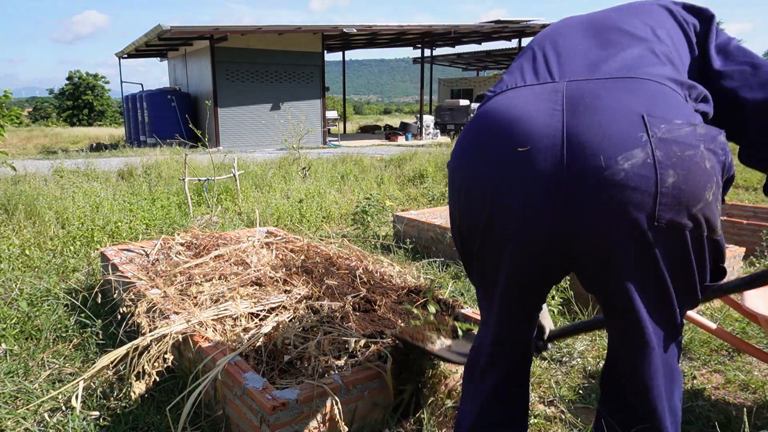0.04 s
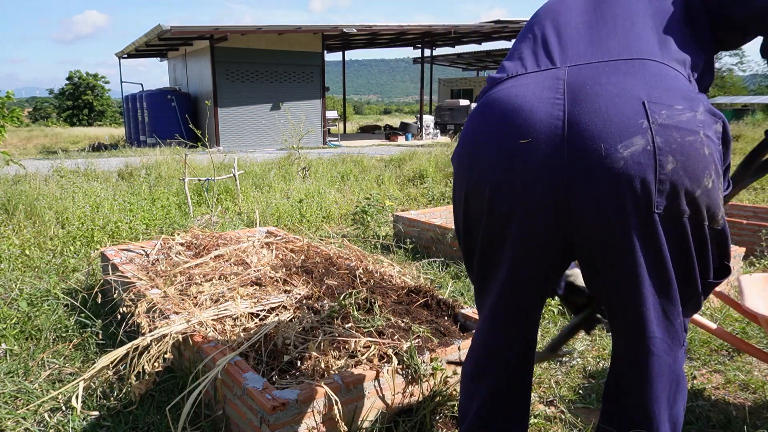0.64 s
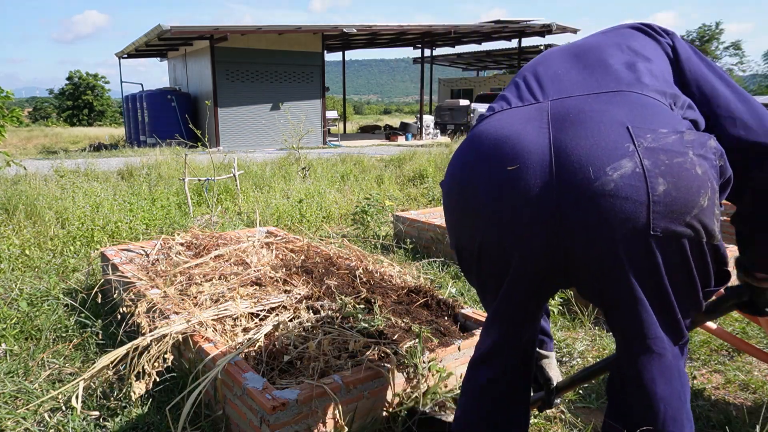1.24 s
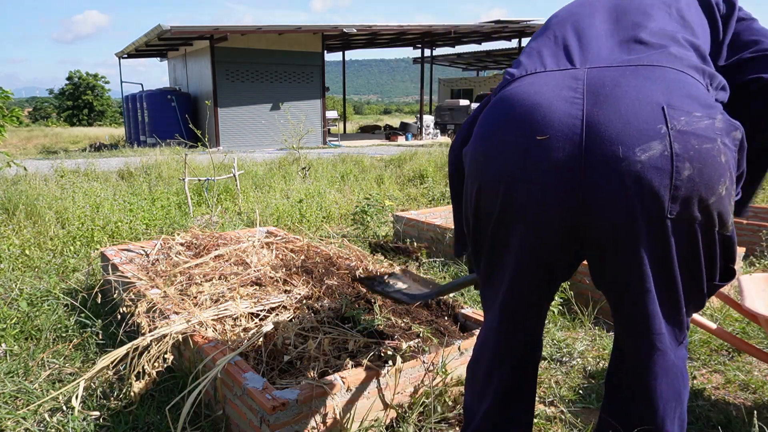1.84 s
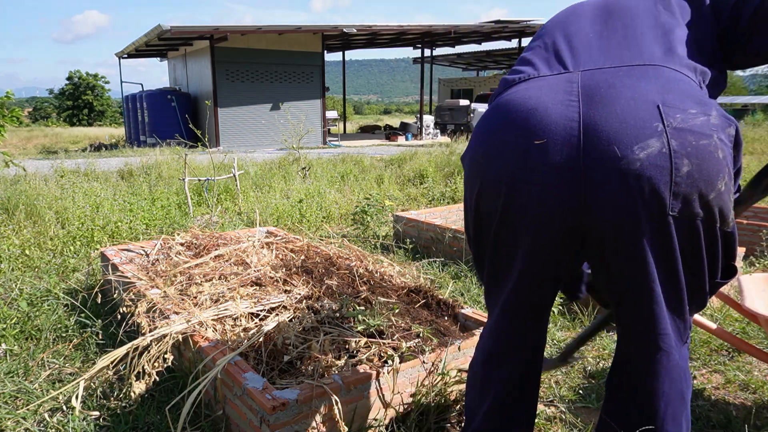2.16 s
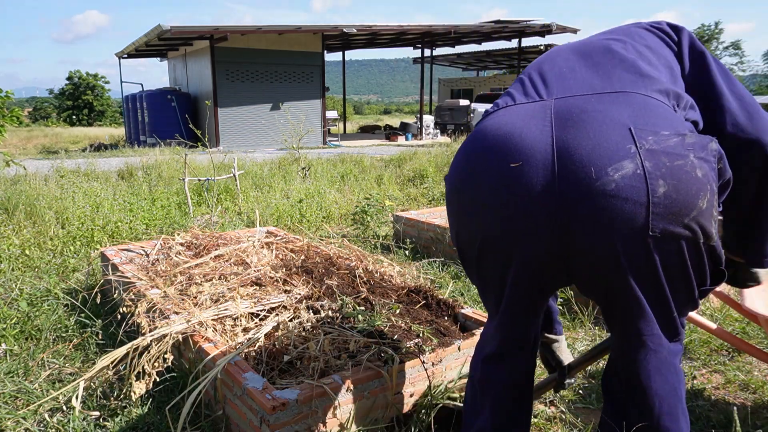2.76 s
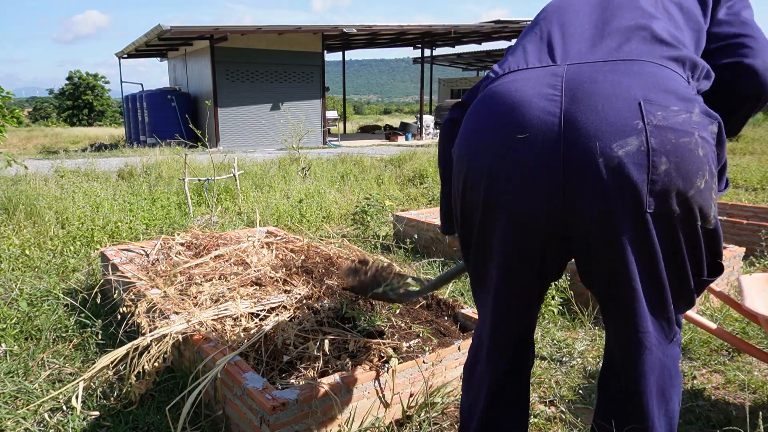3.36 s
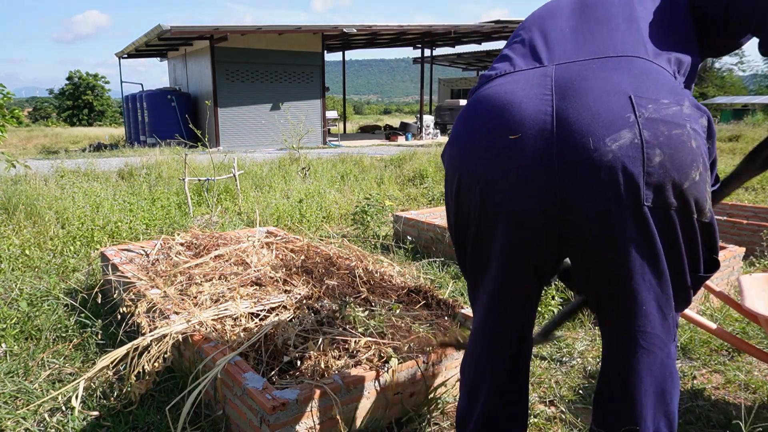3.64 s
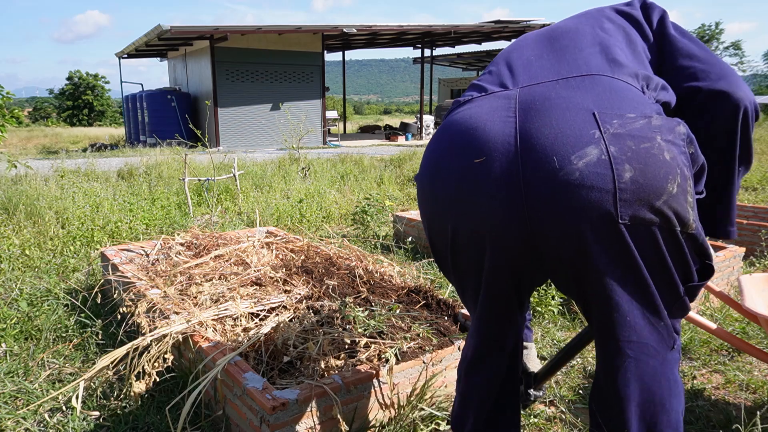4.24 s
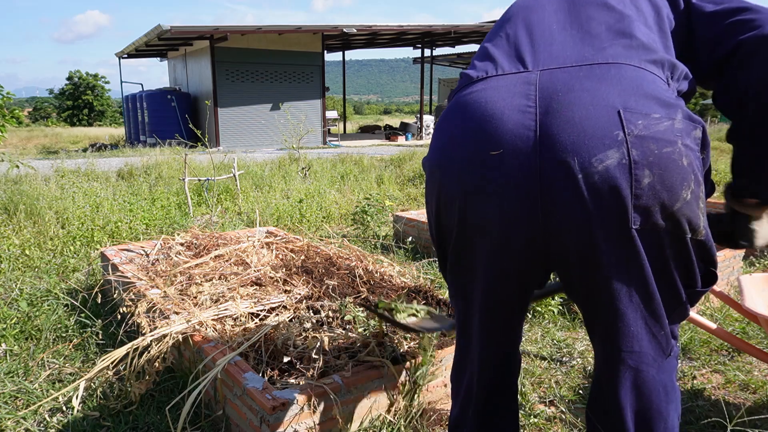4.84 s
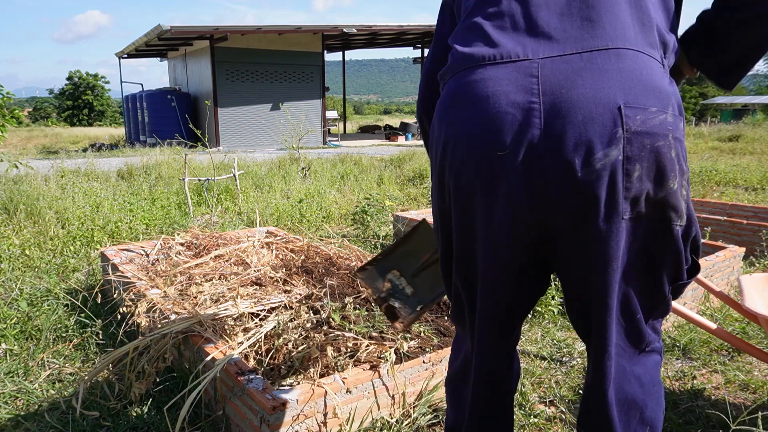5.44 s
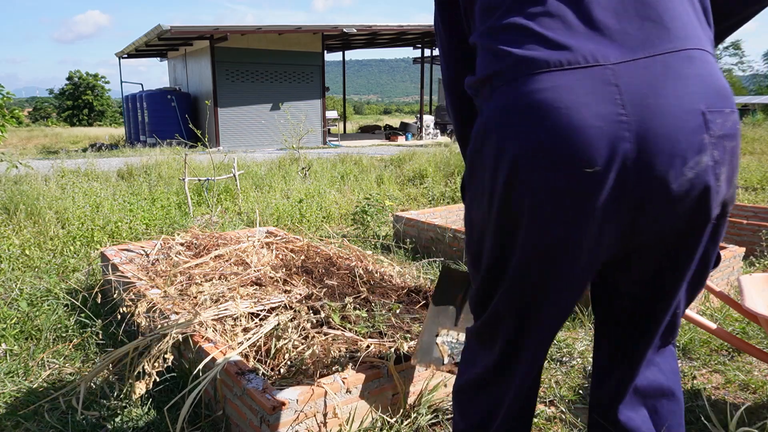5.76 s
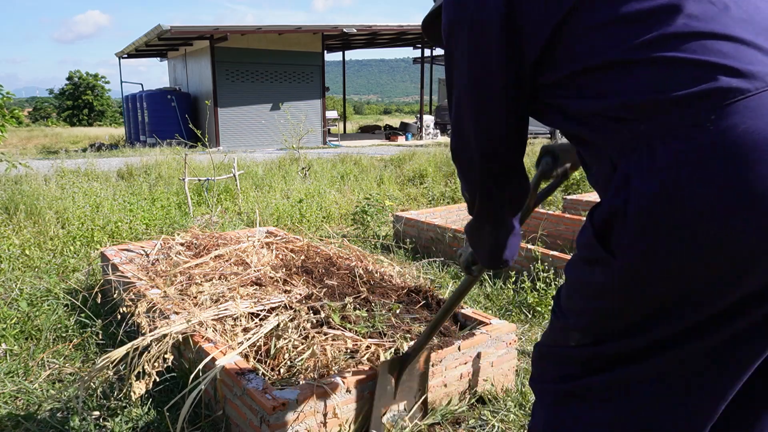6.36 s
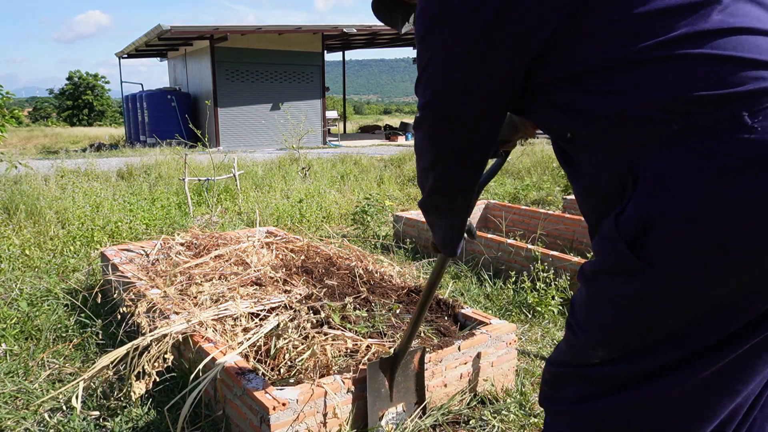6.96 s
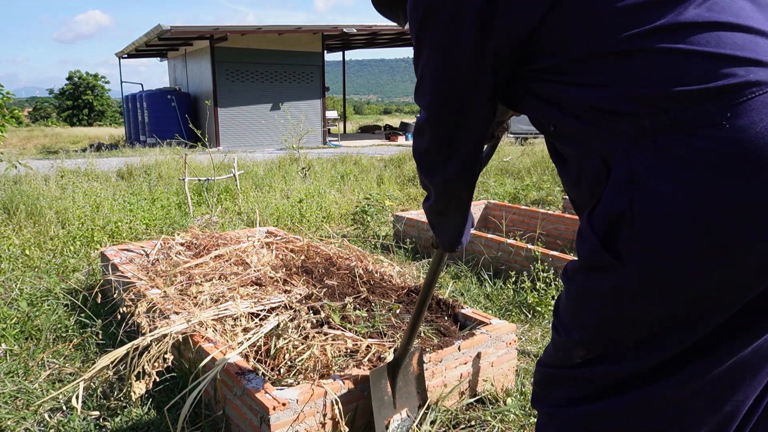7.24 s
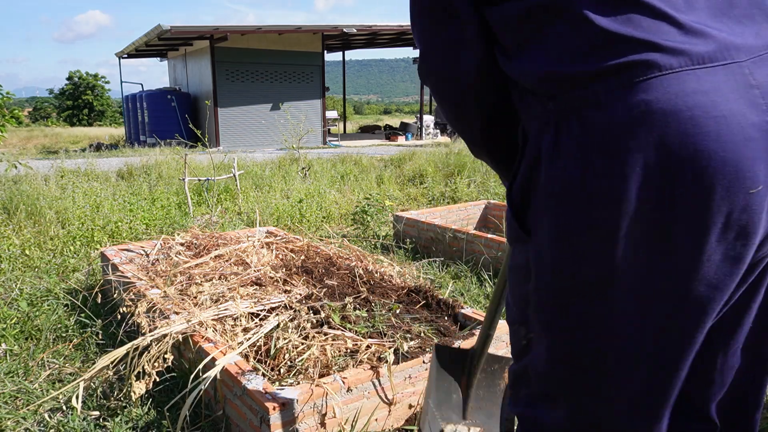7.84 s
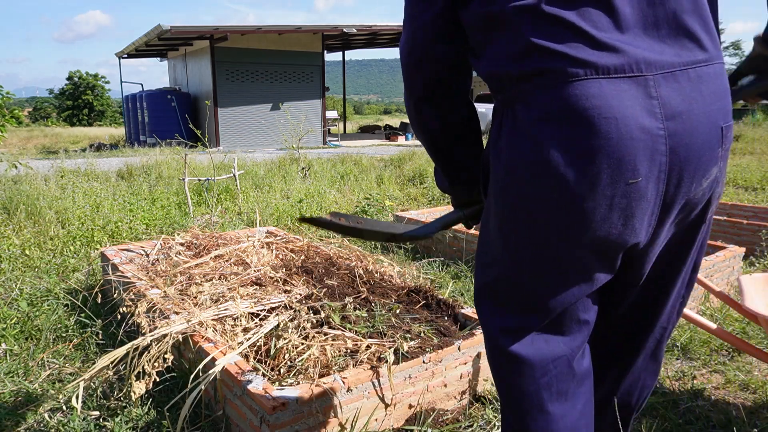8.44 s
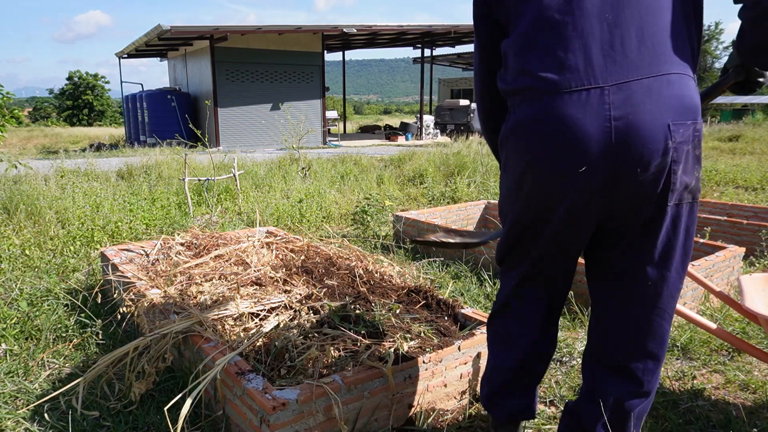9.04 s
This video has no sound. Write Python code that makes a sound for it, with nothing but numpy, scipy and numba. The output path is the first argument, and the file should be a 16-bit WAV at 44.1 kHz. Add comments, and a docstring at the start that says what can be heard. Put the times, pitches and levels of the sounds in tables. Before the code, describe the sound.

A steel spade works close by in compost and dry straw, outdoors with almost no echo. Cicadas hold a high warbling whine throughout over a faint hiss of air. After light rustling, the blade chops in at 1 second with a gritty crunch and soft thud, then scrapes until about 1.7. A second stroke lands at 2.5 seconds, grinding into a sharp metallic hit at 3, and the load slides softly off at 3.4. More crunching chops come at 4 and 4.4, followed by scraping, snapping stalks and rustling until about 6. A loud, briefly ringing knock falls at 6.4 seconds, with dull clods around it. The blade scrapes and catches again from 7 to 7.8, then only faint rustles and ticks of straw remain until just past 9. A distant bird gives a few quick raspy chirps near 2 and 9 seconds.

```python
"""Digging compost in a field

A steel spade works in a straw-covered brick bed. Each contact crushes grit, thumps the soil and excites
the blade's modes, which are damped while buried and ring on when lifted. Friction grinds, stalks crackle
by brittle fracture, and the load slides onto the straw. Cicadas keep up a high warbling whine with their
tymbals; a far bird calls now and then over the hiss of air and grass."""
import sys
import numpy as np
from scipy import signal
from scipy.fft import rfft, irfft
from scipy.io import wavfile
from numba import njit

SR = 44100
rng = np.random.default_rng(int(sys.argv[2]) if len(sys.argv) > 2 else 0)


def store_pcm(level_fs):
    """Save levels as 16-bit WAV."""
    pcm = np.round(np.clip(level_fs, -1, 1) * 32767).astype(np.int16)
    wavfile.write(sys.argv[1], SR, np.atleast_2d(pcm).T)


N = 405719

# spectrum of shifting soil: f/Hz, level/dB
SOIL_SPECTRUM = [(50, -44.5), (100, -32.5), (150, -29.5), (290, -22), (390, -4.5), (490, 1), (700, 10),
                 (1100, 3), (1600, -14.5), (3000, -37.5)]
# spectrum of cracking straw: f/Hz, level/dB
STRAW_SPECTRUM = [(150, -60), (400, -24.5), (1200, -10.5), (2200, 0), (3000, 3), (4600, 3.5), (6300, -2.5),
                  (8000, -6.5), (11000, -23), (15500, -29.5)]


def from_db(db):
    """Amplitude ratio of a level in decibels."""
    return 10 ** (np.asarray(db) / 20)


def rms_one(x):
    """Normalisation to unit power."""
    return x / np.sqrt(np.mean(x ** 2) + 1e-20)


def in_time(rows):
    """Linear interpolation of each column of a timed table to every sample."""
    times, *columns = np.transpose(rows)
    return [np.interp(np.arange(N) / SR, times, column) for column in columns]


def add(track, onset, sound):
    """Superposition of a sound on a track, at an onset in seconds."""
    start = max(round(onset * SR), 0)
    track[start:start + len(sound)] += sound[:N - start]


def gestures(rows, attack_s, release_t60):
    """Summed envelopes of linear rise, hold and exponential decay; rows are t/s, length/s, height."""
    out = np.zeros(N)
    for onset, length, height in rows:
        t = np.arange(round((length + 1.5 * release_t60) * SR)) / SR
        decay = from_db(-60 * np.maximum(t - length, 0) / release_t60)
        add(out, onset, height * np.minimum(t / attack_s, 1) * decay)
    return out


def drift(rate_hz):
    """Slow random modulation: low-passed noise of unit rms."""
    step, settle = 20, 4000
    pole = np.exp(-2 * np.pi * step * rate_hz / SR)
    noise = rng.standard_normal(N // step + settle + 2)
    slow = signal.lfilter([1], [1, -2 * pole, pole * pole], noise)[settle:]
    return np.interp(np.arange(N) / step, np.arange(len(slow)), rms_one(slow))


def low_pass(x, hz, order=2):
    """Maximally flat attenuation above a cutoff."""
    return signal.sosfilt(signal.butter(order, min(hz, .45 * SR), fs=SR, output="sos"), x)


def coloured(x, spectrum):
    """Minimum-phase filtering to a spectrum; white noise keeps its power."""
    size = 4096
    hz, db = np.transpose(spectrum)
    bins_hz = np.fft.rfftfreq(size, 1 / SR) + 1
    log_gain = np.log(from_db(np.interp(np.log(bins_hz), np.log(hz), db)))
    causal_cepstrum = 2 * irfft(log_gain)[:size // 2]
    response = irfft(np.exp(rfft(causal_cepstrum, size) - log_gain.mean()))
    return signal.oaconvolve(x, response / np.linalg.norm(response))[:N]


def grains(per_s, spread_db, hiss):
    """Shot noise: random tiny fractures, a few of them large, over a bed of finer ones."""
    sizes = from_db(spread_db * np.minimum(rng.exponential(1, N), 5)) * rng.choice([-1, 1], N)
    fractures = rms_one(sizes * (rng.random(N) < per_s / SR))
    return rms_one(fractures + hiss * rng.standard_normal(N))


def panned(x, left_db):
    """Localisation by level difference, left minus right."""
    return x * from_db([[left_db / 2], [-left_db / 2]])


def diffuse(t60):
    """Impulse response of dense, exponentially decaying reflections, with unit energy."""
    t = np.arange(SR // 8) / SR
    cluster = rng.standard_normal(len(t)) * from_db(-60 * t / t60)
    return cluster / np.linalg.norm(cluster)


def scattered(x, t60, top_hz):
    """Diffuse reflection from the shed, the trees and the ground, in stereo."""
    t = np.arange(SR) / SR
    tail = rng.standard_normal(SR) + .3 * rng.standard_normal((2, SR))
    tail = low_pass(tail, top_hz) * from_db(-60 * t / t60) * np.minimum(t / .02, 1)
    return signal.oaconvolve(x[None], tail / np.linalg.norm(tail[0]), axes=1)[:, :N]


def field_air():
    """Far air and grass give broadband noise, partly coherent between left and right."""
    # ambient spectrum: f/Hz, level/dB
    spectrum = [(25, -20), (100, -18.5), (300, -9.5), (900, -6), (2500, 0.5), (5000, 2.5), (8000, -11.5),
                (15000, -30)]
    mid, side = [coloured(rng.standard_normal(N), spectrum) for _ in range(2)]
    return from_db(-68) * mid + from_db(-74.5) * side * np.array([[1], [-1]])


def cicada(hz, db, warble_hz, depth_hz, shift_hz):
    """Tymbal clicks fuse into a warbling tone; resonance of the abdomen lifts the fifth harmonic."""
    # partials of the click train: harmonic number, level/dB
    harmonics = [(4, -24), (5, 0), (6, -25), (7, -27), (8, -38)]
    warble_cycles = np.cumsum(warble_hz * (1 + .08 * drift(2))) / SR + rng.random()
    pitch = hz + shift_hz + depth_hz * np.sin(2 * np.pi * warble_cycles) + 14 * drift(180)
    click_rate = pitch / 5
    phase = 2 * np.pi * np.cumsum(click_rate) / SR
    song = sum(from_db(level_db) * np.sin(k * phase) for k, level_db in harmonics)
    return from_db(db + 2.4 * drift(30)) * rms_one(song)


def insects():
    """A cicada chorus, a nearer singer and a far trill add incoherently and are scattered by leaves."""
    # chorus: f/Hz, relative level/dB, warble rate/Hz, warble depth/Hz, left minus right/dB
    singers = [(6750, -76.5, 29, 100, 7), (7300, -65.5, 10.9, 105, 0.5), (6976, -59.5, 17, 110, 9),
               (7110, -60, 10.3, 97, 11.5), (6990, -69, 15, 95, 1), (7260, -68, 5.5, 76, 4)]
    # the nearer cicada: same columns
    near_singer = (7310.5, -3, 13, 98, -5.5)
    # course of the song: t/s, pitch shift/Hz, chorus gain/dB, near gain/dB
    singing = [(0, -4.5, 1, -52), (1, -17, 2.5, -57), (2.2, -45, 3, -64.5), (3.4, -6.5, 0.5, -53),
               (5, 0, 3.5, -58.5), (6, 16.5, 0, -57.5), (7, 22, -0.5, -53), (7.9, 11, -1.5, -50.5),
               (8.25, 11, 0.5, -47), (8.6, 0, 1.5, -67), (9, 29, 1, -48), (9.2, 15, 5.5, -58)]
    # spectrum of the far trill: f/Hz, level/dB
    trill_spectrum = [(4300, -44), (4650, -5.5), (4830, 9.5), (4980, -10.5), (5300, -45.5)]
    shift_hz, chorus_db, near_db = in_time(singing)
    chorus = sum(panned(cicada(*voice, shift_hz), left_db) for *voice, left_db in singers)
    near = panned(cicada(*near_singer[:-1], shift_hz), left_db=near_singer[-1])
    trill = from_db(-74 + 2 * drift(12)) * coloured(rng.standard_normal(N), trill_spectrum)
    songs = chorus * from_db(chorus_db) + near * from_db(near_db) + panned(trill, left_db=13)
    foliage = signal.oaconvolve(songs.mean(axis=0), diffuse(t60=.03))[:N]
    return songs + foliage * np.array([[1], [-1]])


def effort():
    """Scrapes and rustles add in power; returns the envelopes on soil, steel, stalks and fine fibres."""
    # the blade pushed through compost: t/s, length/s, level/dB, relative drag/dB, relative soil/dB
    scrapes = [(1.045, 0.15, -55, -1, -33), (1.205, .2, -45, 0, -34), (1.447, 0.2, -48, 4, -19),
               (2.72, 0.21, -51.5, 5.5, -13), (4.325, 0.17, -45.5, -6.5, -26),
               (4.611, 0.15, -45.5, -4, -16.5), (7.029, 0.19, -48.5, 3, -16), (7.241, .14, -44.5, -4, -45),
               (7.43, 0.2, -43.5, -15.5, -53), (7.525, 0.22, -49, -0.5, -32)]
    # straw stirred by spade, boots and falling compost: t/s, length/s, level/dB, relative crackle/dB
    rustles = [(0, 0.27, -59, -6.5), (0.423, 0.26, -64.5, -4.5), (1.692, 0.27, -64.5, -10),
               (2.58, 0.23, -56, -20), (3.018, 0.12, -53.5, -20), (3.51, .1, -54, -7),
               (3.648, 0.11, -63, -3.5), (3.79, 0.11, -54, -20), (4.093, 0.89, -55.5, -6),
               (4.705, 0.17, -56.5, 3), (4.947, 0.35, -57.5, -7.5), (5.333, .22, -57, -5.5),
               (5.602, 0.27, -56.5, -35.5), (5.984, 0.15, -54, -24), (6.145, 0.33, -48.5, -11),
               (6.473, 0.3, -50.5, -23), (6.788, 0.22, -63, -23), (8.021, 0.72, -68, -23),
               (9.07, 0.12, -57, -9.5)]
    scrape_at, scrape_length, push_db, drag_db, soil_db = np.transpose(scrapes)
    rustle_at, rustle_length, rustle_db, crackle_db = np.transpose(rustles)

    def scraping(db):
        return gestures(zip(scrape_at, scrape_length, from_db(db)), attack_s=.04, release_t60=.2584)

    def rustling(db):
        return gestures(zip(rustle_at, rustle_length, from_db(db)), attack_s=.044, release_t60=.27)

    stir_db = -75   # the straw is never quite still
    push = scraping(push_db)
    rustle = np.hypot(rustling(rustle_db), from_db(stir_db))
    crackle = np.hypot(rustling(rustle_db + crackle_db), from_db(stir_db - 18))
    # each rustle also brushes the soil and the blade a little
    on_soil = np.hypot(scraping(push_db + soil_db), rustle * from_db(-40))
    on_steel = np.hypot(scraping(push_db + drag_db), rustle * from_db(-22.5))
    on_straw = np.hypot(push, rustle)
    on_fibres = np.hypot(push * from_db(-10.5), crackle)
    return on_soil, on_steel, on_straw, on_fibres


def ticks(per_s=30, t60=.01, spread_db=3, level_db=-71.5):
    """Single stalks settle at random instants, each crack an exponentially decaying noise burst."""
    cracks = (rng.random(N) < per_s / SR) * from_db(spread_db * np.clip(rng.standard_normal(N), -2, 2))
    envelope = signal.lfilter([1], [1, -from_db(-60 / (t60 * SR))], cracks + 1e-18)
    return from_db(level_db) * coloured(rms_one(envelope * rng.standard_normal(N)), STRAW_SPECTRUM)


def digging():
    """Friction and fracture in soil and stalks come in surges; returns sound and force on the blade."""
    # force spectrum of grit dragged over steel: f/Hz, level/dB
    drag_spectrum = [(300, -8), (500, -2), (900, -10), (1300, -7), (1600, 2), (1950, -1), (2800, -2),
                     (3500, -3), (4200, -13), (8000, -20)]
    # spectrum of the finest fibres breaking: f/Hz, level/dB
    fibre_spectrum = [(2000, -35.5), (6000, 0), (9000, 4), (12000, -0.5), (15800, -10)]
    on_soil, on_steel, on_straw, on_fibres = effort()
    surge = from_db(2.2 * drift(30))
    soil = on_soil * coloured(grains(per_s=300, spread_db=4.5, hiss=.96), SOIL_SPECTRUM)
    drag = on_steel * coloured(grains(per_s=2100, spread_db=6, hiss=.58), drag_spectrum) * surge
    stalks = on_straw * coloured(grains(per_s=2600, spread_db=3.6, hiss=.7), STRAW_SPECTRUM)
    crackle = on_fibres * coloured(grains(per_s=3500, spread_db=3.6, hiss=.8), fibre_spectrum)
    sound = (soil + stalks + crackle) * surge + ticks()
    force = from_db(-34) * drag + from_db(-36.5) * soil
    return sound, force


def contacts():
    """Transient excitations: t/s, rise/s, t60/s, level/dB, thud/dB, cutoff/Hz, ring/dB, edge share."""
    # Thud and ring are relative gains; the edge share runs from 0 (flat) to 1 (edge on).
    # chops into the heap or the bed wall: t/s, rise/s, t60/s, level/dB, thud/dB, ring/dB, edge share
    blows = [(1.006, 0.0087, 0.16, -28.5, 4, -18, 0), (1.02, 0.0056, 0.025, -24, 18.5, 7.5, 0.36),
             (1.148, 0.0018, 0.028, -19.5, 5, -4.5, 0.95), (1.601, 0.0017, 0.26, -34.5, 21.5, 1, .4),
             (2.547, 0.0029, 0.069, -22.5, -7, -12, 0), (2.556, 0.0044, .095, -14.5, 12, -1.5, 0.48),
             (2.619, 0.011, 0.054, -23.5, 24.5, -2.5, 0.025), (2.965, 0.0011, 0.078, -22, 12, -6.5, 0),
             (2.994, 0.0012, 0.088, -8.5, -4, 0.5, 0.0042), (4.022, 0.005, .16, -25.5, -1.5, 1, 0.84),
             (4.041, 0.0094, 0.044, -14.5, 15.5, -15.5, 0.57), (4.054, 0.032, 0.11, -25.5, 8, 9.5, 0.39),
             (4.081, 0.0052, 0.068, -10.5, 1, -14, 0.43), (4.388, 0.0038, 0.075, -15, 2, -4, 0.9),
             (4.778, 0.0014, 0.071, -31.5, 20.5, 4.5, 0.75), (6.413, .001, 0.11, -11, 0, 0.5, 0.96),
             (6.42, 0.024, .041, -8.5, -21, -7, 1), (6.442, 0.0038, 0.006, -7.5, -34, 0, 0.96),
             (6.451, 0.0047, 0.034, -27, -26, 24.5, 1), (7.568, .0025, 0.15, -25, 12, 0.5, 0.44)]
    # the blade catches on lumps and stalks: t/s, t60/s, level/dB, ring/dB
    snags = [(.010, 0.16, -41, -10.5), (1.238, 0.18, -37, 2), (1.268, 0.2, -28.5, 2),
             (1.310, 0.042, -31.5, -6), (1.376, 0.085, -28.5, 3), (1.398, 0.036, -46, -9),
             (1.417, 0.029, -32.5, -8), (1.486, 0.049, -38.5, 10.5), (2.784, 0.064, -30, 6.5),
             (2.84, 0.085, -33.5, 0), (2.923, 0.017, -29, 2.5), (4.458, 0.071, -40.5, -9),
             (5.164, 0.071, -44, -16), (6.504, 0.057, -36.5, 2), (7.062, 0.18, -31.5, -14),
             (7.13, 0.47, -32.5, 1.5), (7.285, 0.75, -45.5, -13), (7.612, 0.065, -30, 1),
             (7.629, 0.055, -30, -1.5), (7.694, 0.14, -33, -16.5)]
    # the load slides off the blade: t/s, level/dB, ring/dB
    tosses = [(0.356, -47.5, -15), (3.404, -43, -22), (5.119, -51, 1), (8.368, -58.5, -0.5)]
    # dull knocks of clods: t/s, level/dB
    clods = [(0.166, -50), (.755, -49), (4.548, -44), (5.034, -47), (6.314, -34), (6.672, -32),
             (8.406, -48.5)]
    # dry stalks snap: t/s, level/dB
    snaps = [(0.048, -46), (0.773, -46), (0.801, -50), (0.842, -55), (3.835, -52), (3.931, -49),
             (4.853, -48), (4.873, -46), (4.903, -44), (4.971, -57), (4.991, -48), (5.818, -47.5),
             (8.257, -62), (9.097, -51)]
    flat_hz, edge_hz = 7350, 1500   # a flat blow is the brighter
    return ([(t, rise, t60, db, thud, flat_hz + (edge_hz - flat_hz) * edge ** 2, ring, edge)
             for t, rise, t60, db, thud, ring, edge in blows]
            + [(t, .002, t60, db, -2.5, 7400, ring, .55) for t, t60, db, ring in snags]
            + [(t, .036, .32, db, -44, 6500, ring, .25) for t, db, ring in tosses]
            + [(t, .0022, .079, db, 3.5, 2300, -7, .65) for t, db in clods]
            + [(t, .00067, .026, db, -17, 15000, -6, .38) for t, db in snaps])


def strikes():
    """Inelastic impacts crush grit and thump the soil; returns sound and forces on face and edge."""
    # spectrum of grit crushed on steel: f/Hz, level/dB
    crunch_spectrum = [(24, -67.5), (40, -45.5), (230, -41.5), (596, -20.5), (1010, -18), (1330, -11),
                       (1980, 3.5), (2360, -4), (2670, 2), (4300, -2), (5670, -4.5), (6920, -5.5),
                       (8040, -9.5), (13300, -20), (15800, -54)]
    crush, thump, flat, edge = np.zeros((4, N))
    grit = grains(per_s=6500, spread_db=2, hiss=.66) * from_db(1.8 * drift(100))
    coarse = low_pass(grit, 5600, order=1)
    soil = rms_one(low_pass(rng.standard_normal(N), 590))
    t = np.arange(SR // 4) / SR
    for onset, rise, t60, db, thud_db, top_hz, ring_db, edge_share in contacts():
        start = round(onset * SR)
        span = slice(start, start + len(t))
        decay = from_db(-60 * np.maximum(t - rise, 0) / t60)
        speed = (np.minimum(t / rise, 1) * decay)[:N - start]
        # the finest fractures stop first as the blade slows
        fractures = coarse[span] + (grit[span] - coarse[span]) * np.sqrt(speed)
        burst = from_db(db) * low_pass(speed * fractures, top_hz, order=1)
        push = from_db(db + thud_db - 23.5) * speed * soil[span]
        force = (burst + push) * from_db(ring_db - 32)
        add(crush, onset, burst)
        add(thump, onset, push)
        add(flat, onset, force * (1 - edge_share))
        add(edge, onset, force * edge_share)
    crunch = from_db(.67) * coloured(crush, crunch_spectrum)
    thud = from_db(-18) * coloured(thump, SOIL_SPECTRUM)
    return crunch + thud, flat, edge


@njit
def resonate(force, pole, damping):
    """Velocity of a driven, damped oscillator with a time-varying extra loss."""
    velocity, state = np.zeros(len(force)), 0j
    for i in range(len(force)):
        state = state * (pole * damping[i]) + force[i]
        velocity[i] = state.real
    return velocity


def blade(flat, edge):
    """Modal vibration of a steel plate, driven on face and edge and damped by the soil round it."""
    # modes of the blade: f/Hz, level struck flat/dB, level struck edge on/dB, t60/s
    modes = [(495, -22, -35, .18), (642, -11, -19, .1), (812, -3, -28, .11), (829, -18, -48, .95),
             (872, -24, -20, .15), (1076, -22, -7, .15), (1357, -26, -18, .22), (1415, -12, -9, .15),
             (1577, -8, -15, .1), (1663, -20, -8, .14), (1766, -14, -4, .13), (1816, 1, -1, .13),
             (1852, -4, -4, .08), (1970, 3, -4, .08), (2025, -6, -3, .11), (2277, -12, -19, .08),
             (2439, -56, -26, 1.5), (2514, -46, -18, .65), (2575, -9, -12, .1), (2745, -14, -20, .11),
             (2865, -12, -14, .12), (3063, -17, -13, .14), (3106, -42, -28, .8), (3354, -8, -18, .09),
             (3490, -14, -6, .09), (3670, -9, -11, .09), (3962, -13, -24, .11), (4194, 2, -22, .11),
             (4530, -10, -26, .1), (5470, -9, -24, .07)]
    # soil grips the blade: t/s, length/s, extra decay/(dB/s)
    buried = [(.98, 0.97, 680), (2.53, 0.31, 260), (4.0, 0.91, 450), (4.85, .45, 260), (7.0, 0.44, 450.5)]
    loss_db_per_s = 1.5 + gestures(buried, attack_s=.03, release_t60=.42)
    damping = from_db(-loss_db_per_s / SR)
    # the point of contact wanders, favouring now one mode, now another
    wander = rms_one(from_db(3.5 * drift(12)))
    velocity = np.zeros(N)
    for k, (hz, flat_db, edge_db, t60) in enumerate(modes):
        omega = 2 * np.pi * hz / SR
        pole = from_db(-60 / (t60 * SR)) * np.exp(1j * omega)
        weight = (-1) ** k / omega   # neighbouring modes swing in opposite senses
        coupling = weight * np.roll(wander, k * N // len(modes))
        force = from_db(flat_db) * flat + from_db(edge_db) * edge
        velocity += resonate(coupling * force, pole, damping)
    return np.diff(velocity, prepend=0)   # a plate radiates its acceleration


def ground(t60=.073):
    """Heavily damped vibration: the ground and the bed wall shudder under the heavier blows."""
    # shudders: t/s, level/dB
    thuds = [(1.032, -47.5), (1.611, -69), (2.56, -67), (2.996, -63.5), (4.092, -49), (4.78, -74),
             (6.416, -49), (6.455, -42), (6.672, -55.5), (7.572, -61)]
    # response of ground and wall: f/Hz, level/dB
    spectrum = [(30, -21.5), (85, -23), (130, -7), (200, 3), (300, -1), (600, -26)]
    shake, t = np.zeros(N), np.arange(SR // 2) / SR
    for onset, db in thuds:
        add(shake, onset, from_db(db - 60 * t / t60))
    return coloured(shake * rng.standard_normal(N), spectrum)


def bird(rasp_hz=230):
    """Quick slurs, made raspy by random frequency modulation and blurred by distant scattering."""
    # notes: t/s, length/s, start f/Hz, end f/Hz, level/dB
    notes = [(2.107, .039, 3850, 3340, -54), (2.169, 0.039, 3350, 3490, -49.5),
             (2.24, 0.1, 2700, 2740, -61), (2.319, 0.01, 3400, 3630, -49), (8.866, 0.074, 3850, 3206, -58),
             (8.923, 0.048, 3650, 3280, -49.5), (8.998, 0.066, 3850, 3500, -59.5),
             (9.065, .05, 3400, 3730, -53.5)]
    calls, hoarse = np.zeros(N), drift(500)
    for onset, length, start_hz, end_hz, db in notes:
        progress = np.linspace(0, 1, round(length * SR))
        rasp = rasp_hz * np.roll(hoarse, -round(onset * SR))[:len(progress)]
        pitch = start_hz + (end_hz - start_hz) * progress + rasp
        envelope = from_db(db) * np.sin(np.pi * progress)
        add(calls, onset, envelope * np.sin(2 * np.pi * np.cumsum(pitch) / SR))
    return calls + from_db(-4) * scattered(calls, t60=.5, top_hz=6000)


def two_ports(x):
    """Close sounds are central; only short wavelengths reach the two microphone ports differently."""
    # difference between the ports: f/Hz, level/dB
    port_spectrum = [(300, -28.5), (900, -26.5), (2000, -25.5), (3000, -18.5), (5000, -6.5), (8000, 2),
                     (11000, 1), (16000, 1)]
    treble = x - low_pass(x, 7500, order=1)
    blur = signal.oaconvolve(coloured(x, port_spectrum), diffuse(t60=.012))[:N]
    side = .12 * treble + from_db(-13) * blur
    return np.array([x + side, x - side])


def scene():
    """Superposition of the close, central spade, its faint echo and the field all round."""
    impacts, flat, edge = strikes()
    rustle, drag = digging()
    spade = impacts + ground() + rustle + blade(flat + drag, edge + .3 * drag)
    air = field_air()
    direct = two_ports(spade)
    echo = from_db(-31.5) * scattered(spade, t60=.59, top_hz=5000)
    return direct + echo + insects() + bird() + air


def record(dry):
    """Soft saturation rounds the highest peaks; band limiting cuts the deep bass and the top."""
    low_hz, high_hz = 95, 15900
    bass_cut = signal.butter(3, low_hz, "high", fs=SR, output="sos")
    top_cut = signal.ellip(12, .1, 80, high_hz, fs=SR, output="sos")
    return signal.sosfilt(top_cut, signal.sosfilt(bass_cut, np.tanh(dry)))


dry = scene()
out = record(dry)
store_pcm(out)
```